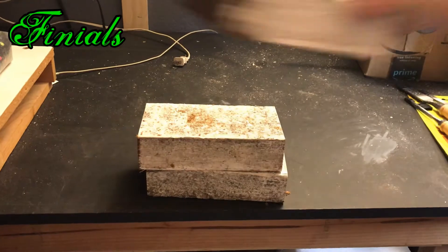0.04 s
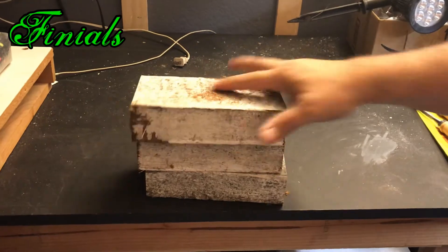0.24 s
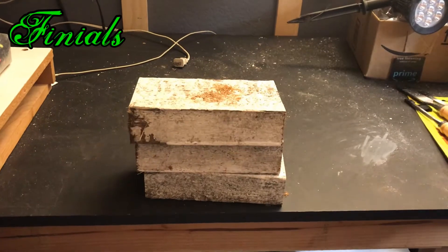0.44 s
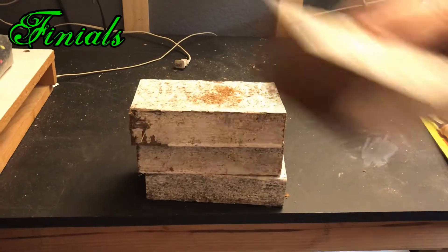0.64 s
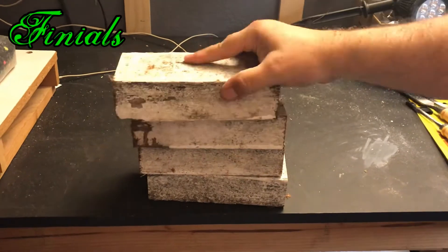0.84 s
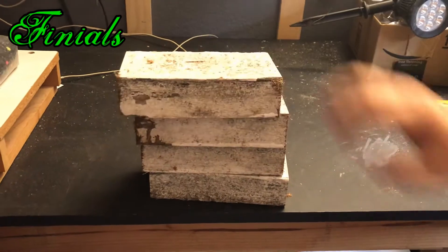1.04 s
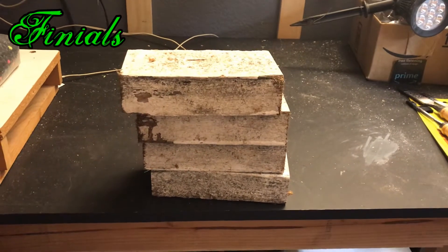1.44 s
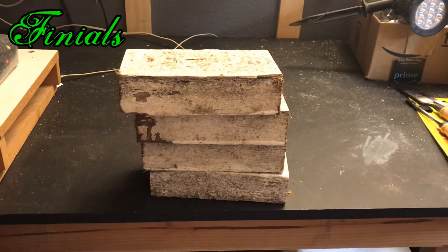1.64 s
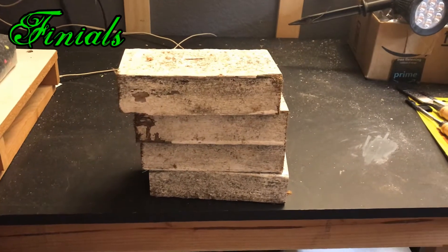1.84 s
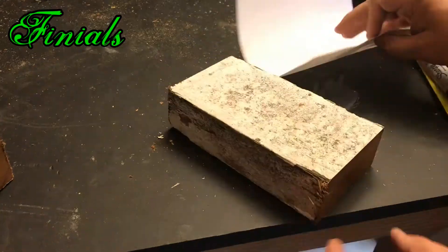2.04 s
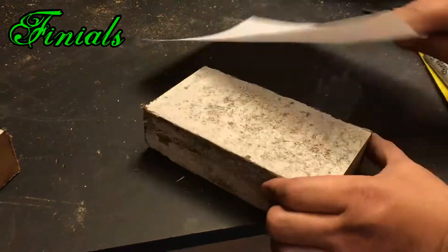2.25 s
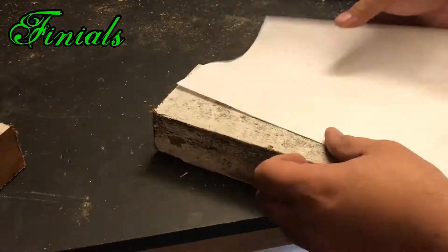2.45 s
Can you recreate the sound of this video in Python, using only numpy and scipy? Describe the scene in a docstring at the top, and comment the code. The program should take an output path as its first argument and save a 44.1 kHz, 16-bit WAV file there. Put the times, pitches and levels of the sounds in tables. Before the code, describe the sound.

Bricks land on a stack twice with sharp, stony clacks that ring the workbench, over a faint indoor fan. The sound shifts closer to a nudged brick and a crinkling sheet of paper, with light hiss.

```python
"""In a small shop with a humming fan, two bricks are set on a stack on a workbench. Each touches with
an edge, lands with a gritty snap and a clack, and rings the bench; the recorder's gain ducks after each.
Between them the second brick rubs as it is picked up. Soft low bumps come around the first landing and
after the second. At about 2 s the scene cuts to a closer spot with hiss and a faint whine, where a brick
is nudged over the bench, scuffing and knocking, and a crinkling sheet of paper is brought onto it."""
import sys
import numpy as np
from scipy import signal
from scipy.fft import rfft, irfft
from scipy.io import wavfile
from scipy.ndimage import uniform_filter1d, minimum_filter1d

SR = 44100
rng = np.random.default_rng(int(sys.argv[2]) if len(sys.argv) > 2 else 0)


def transcribe(signal):
    """Save signal, clipped to [-1, 1], as a 16-bit WAV file at the path in sys.argv[1]."""
    frames = np.atleast_2d(signal).T
    limited = np.clip(frames, -1, 1)
    pcm = np.round(limited * 32767).astype(np.int16)
    wavfile.write(sys.argv[1], SR, pcm)


N = 114660
TIME = np.arange(N) / SR
BAND_LIMIT_HZ = 15900


def amp(db):
    return 10 ** (np.asarray(db) / 20)


def unit(x):
    """Scales to rms 1."""
    return x / np.sqrt(np.mean(x ** 2) + 1e-20)


def read(points, hz):
    """Interpolates a table over log frequency."""
    f, value = np.transpose(points)
    return np.interp(np.log(hz + 1), np.log(f + 1), value)


def add(mix, start_s, sound):
    part = mix[max(round(start_s * SR), 0):][:len(sound)]
    part += sound[:len(part)]


def noise(spectrum, size, tilt_db_per_oct=0, focus_hz=None):
    """Coloured noise of rms 1; optional treble tilt and one resonance."""
    tilt_from_hz, focus_db, focus_width_oct = 710, 7.5, 0.26
    hz = np.fft.rfftfreq(size, 1 / SR)
    db = read(spectrum, hz) + tilt_db_per_oct * np.log2(np.maximum(hz / tilt_from_hz, 1))
    if focus_hz:
        offset_oct = np.log2(np.maximum(hz, 1) / focus_hz)
        db = db + focus_db * np.exp(-.5 * (offset_oct / focus_width_oct) ** 2)
    return unit(irfft(amp(db) * np.exp(2j * np.pi * rng.random(len(hz))), size))


def drift(below_hz):
    """Band-limited random wander, rms 1."""
    return unit(irfft(rfft(rng.standard_normal(N)) * (np.fft.rfftfreq(N, 1 / SR) < below_hz), N))


def strike(t, rise_s, t60_s):
    """Soft rise, exponential decay."""
    return (1 - np.exp(-(t / rise_s) ** 2)) * np.exp(-np.log(1000) * t / t60_s)


def tones(lines, waver_hz=1.22):
    """Steady sines, slightly wavering in pitch."""
    out = np.zeros(N)
    for hz, db in lines:
        cycles = np.cumsum(hz + waver_hz * drift(16.4)) / SR + rng.random()
        out += np.sqrt(2) * amp(db) * np.sin(2 * np.pi * cycles)
    return out


def fan():
    """Rush of air, hum, and a narrow treble band that flutters."""
    air_spectrum = [(15, -58), (25, -48), (69, -0.5), (140, -10.5), (173, -2.5), (233, -6.5), (260, -12.5),
                    (349, -8), (552, -13.5), (1450, -13.5), (1570, -11.5), (3170, -22.5), (7300, -28.5),
                    (9300, -30), (15500, -34)]  # rushing air: f/Hz, relative level/dB
    hum_lines = [(176, -49.5), (351.5, -57)]  # fan hum: f/Hz, level/dB
    band_hz, width_hz, band_db = 9300, 470, -54.5
    depth, period_s, peak_s = 0.51, .0955, 0.067
    hz = np.fft.rfftfreq(N, 1 / SR)
    passband = np.exp(-.5 * ((hz - band_hz) / width_hz) ** 2)
    band = unit(irfft(rfft(rng.standard_normal(N)) * passband, N))
    flutter = 1 - depth + depth * np.cos(2 * np.pi * (TIME - peak_s) / period_s)
    air = amp(-43 + 0.32 * drift(19)) * noise(air_spectrum, N)
    return air + tones(hum_lines) + amp(band_db + drift(30)) * band * flutter


def hiss_and_whine():
    """Steady air and faint tones at the closer spot."""
    hiss_spectrum = [(30, -15), (100, -17.5), (190, -5.5), (320, 2), (700, 1), (1050, -2.5), (1600, 0),
                     (2200, -5.5), (4000, -7), (7000, -6), (11000, -12), (15500, -13.5)]  # shop air: f/Hz, relative level/dB
    whine_lines = [(323, -58), (657, -47.5), (834.4, -56), (1250, -54), (1314, -53), (1755, -60.5)]  # whine: f/Hz, level/dB
    return amp(-44) * noise(hiss_spectrum, N) + tones(whine_lines)


def bumps():
    """Dull low pulses of a few cycles each."""
    events = [(.122, -28, 119), (0.162, -31, 134), (0.389, -31, 114), (1.361, -32, 101), (1.395, -31.5, 93),
              (1.737, -26, 92), (1.78, -26, 80), (1.8, -26.5, 124)]  # bumps: t/s, relative level/dB, f/Hz
    rumble = [(20, -27), (70, -7), (220, 5.5), (450, -42), (2000, -55.5)]  # f/Hz, relative level/dB
    out, t = np.zeros(N), TIME[:SR // 4]
    for s, db, hz in events:
        body = np.sin(2 * np.pi * hz * t) + 0.36 * noise(rumble, len(t))
        add(out, s, 2 * amp(db) * strike(t, rise_s=0.0059, t60_s=0.077) * body)
    return out


def friction(events, spectrum, grain_db=0.5):
    """Grainy noise bursts: each swells to a sudden stop, then dies away."""
    out, grain = np.zeros(N), unit(amp(grain_db * drift(580)))
    t = TIME[:SR // 3] - .1  # peak at t = 0
    for s, db, swell_s, t60_s, tilt_db_per_oct, focus_hz in events:
        envelope = np.exp(np.where(t < 0, t / swell_s, -np.log(1000) * t / t60_s))
        add(out, s + t[0], amp(db) * envelope * noise(spectrum, len(t), tilt_db_per_oct, focus_hz))
    return out * grain


def brick_pickup():
    """The second brick rubs as it is lifted."""
    # rubs: t/s, level/dB, swell/s, t60/s, tilt/(dB/oct), resonance/Hz
    rubs = [(.56, -47, 0.0076, .15, 1.5, 5950), (.617, -43.5, 0.017, .25, 1, 5030),
            (.68, -53, 0.057, .4, -1.5, 1200)]
    spectrum = [(40, -25), (300, 0.5), (1500, 8.5), (4000, -12), (10000, -7), (16000, -16)]  # rubbing brick: f/Hz, relative level/dB
    return friction(rubs, spectrum)


def paper():
    """The sheet crinkles in short bright snaps."""
    # snaps: t/s, level/dB, swell/s, t60/s, tilt/(dB/oct), resonance/Hz
    crinkles = [(1.99, -44, .006, 0.096, 6, 6500), (2.075, -41, .004, .12, 2, 10000),
                (2.097, -35.5, .004, 0.033, -3, 12600), (2.1428, -26.5, .0003, 0.0073, -4, 12000),
                (2.1575, -30, .003, 0.025, 7, 6500), (2.4305, -20.5, 0.00032, 0.021, 4, 11800),
                (2.4448, -31, 0.0008, 0.049, -4, 7000), (2.466, -25.5, 0.0049, 0.044, 0, 12500),
                (2.5057, -32.5, .0003, 0.022, 1, 7000), (2.527, -37.5, 0.0048, 0.052, -1, 11000),
                (2.545, -35, 0.0052, .06, -7, 7000), (2.554, -24.5, .0004, 0.027, 1, 6200)]
    spectrum = [(30, -55), (200, -26), (1500, -12), (4500, -3.5), (6400, 1.5), (8000, 0), (11800, 1),
                (14000, -1), (16000, -5.5)]  # paper: f/Hz, relative level/dB
    return friction(crinkles, spectrum)


def brick_nudges():
    """A pushed brick scuffs, then knocks on the bench."""
    # scuffs and knocks: t/s, level/dB, swell/s, t60/s, tilt/(dB/oct), resonance/Hz
    nudges = [(2.046, -32, 0.019, 0.047, 2.5, 3000), (2.0545, -26.5, 0.0019, 0.046, -1.5, 1400),
              (2.1642, -22.5, 0.00013, 0.041, -1, 460), (2.262, -25.5, 0.007, 0.077, 0, 910),
              (2.2633, -21, 0.00089, 0.016, 1.5, 800), (2.3403, -18, 0.00039, 0.02, 1, 4400),
              (2.343, -25.5, 0.0037, 0.05, 1, 1690)]
    spectrum = [(30, -50), (120, -27), (300, -22), (500, 0), (850, -2), (1050, -2.5), (1300, -2.5),
                (1550, -4.5), (1750, 6.5), (2000, -15.5), (2600, -15.5), (3200, -4.5), (4100, -23),
                (4800, -14), (8000, -20.5), (16000, -24)]  # brick on bench: f/Hz, relative level/dB
    return friction(nudges, spectrum)


def clack(t, bands=18, tail_db=-25):
    """Dense brick modes: treble speaks first, bass builds up; the shop adds a short tail."""
    spectrum = [(40, -8), (85, -2), (130, -10), (350, 2), (620, 3), (1000, 1.5), (1800, 1.5), (2700, -1),
                (3450, 2), (4200, -9.5), (5100, -6.5), (6300, -19), (9000, -22), (12000, -29), (16000, -31)]  # brick ring: f/Hz, relative level/dB
    ring_rise = [(100, 0.0061), (700, 0.0096), (1500, 0.003), (3000, 0.00043), (16000, 0.00086)]  # ring build-up: f/Hz, rise/s
    ring_t60 = [(60, 0.24), (400, .15), (1500, .13), (3500, .13), (8000, 0.19), (16000, 0.12)]  # ring decay: f/Hz, t60/s
    shop_t60 = [(100, .6), (300, 0.69), (1000, 0.33), (4000, 0.37), (16000, .25)]  # room decay: f/Hz, t60/s
    hz, centres_hz = np.fft.rfftfreq(len(t), 1 / SR), np.geomspace(60, BAND_LIMIT_HZ, bands)
    ring, out = rfft(noise(spectrum, len(t))), 0
    for centre_hz, weights in zip(centres_hz, np.eye(bands)):
        band = irfft(ring * read(list(zip(centres_hz, weights)), hz), len(t))
        rise_s = read(ring_rise, centre_hz)
        direct = strike(t, rise_s, read(ring_t60, centre_hz))
        tail = amp(tail_db) * strike(t, rise_s, read(shop_t60, centre_hz))
        out = out + band * np.hypot(direct, tail)
    return out


def brick_landings(grit_db=-9.5):
    """An edge touches, the face lands with a gritty snap and a clack, the bench takes the blow."""
    touches = [(0.212, -14.5), (0.2211, -17), (0.225, -23), (0.87, -12), (0.8769, -21), (0.88, -13.5)]  # edge contacts: t/s, level/dB
    touch_spectrum = [(300, -28), (1500, -19), (2500, -11), (3400, 1), (4500, -22.5), (7000, -28.5),
                      (9000, -37.5), (16000, -41)]  # edge tick: f/Hz, relative level/dB
    landings = [(.2277, -2, 4, 6.5), (.8832, 1.5, 5.5, 8)]  # face contacts: t/s, clack gain/dB, bench gain/dB, snap gain/dB
    bench_modes = [(83.1, -34, -14.5, 0.14), (151.7, -19, -26.5, 0.25), (192, -8.5, -8.5, .14),
                   (268, -8, -13.5, 0.14), (471.5, -2, -5, 0.12), (525, -8, -20.5, 0.13),
                   (754, -14.5, -20, .12), (808, -18.5, -6.5, 0.075), (1136, -9, -7, 0.099),
                   (1276, -17, -8.5, .13), (1540, -14.5, -40, 0.11), (1686, -1, -16, 0.077),
                   (2287, -22, -7.5, 0.085), (3134, -32, -5.5, 0.08), (3420, -23, -6.5, 0.069)]  # stack on bench: f/Hz, brick 1 level/dB, brick 2 level/dB, t60/s
    snap_modes = [(1140, -9, -0.5, 0.000454, 0.0046), (1790, -11, 6.5, 0.00043, 0.0057),
                  (2990, -2, 4.5, 0.00063, 0.013), (3400, -4, -0.5, .002, 0.032)]  # stone on stone: f/Hz, brick 1 level/dB, brick 2 level/dB, rise/s, t60/s
    grit_spectrum = [(500, -24.5), (3500, -7), (5100, -24), (6500, 1), (8400, 5), (11000, -4.5),
                     (16000, -12)]  # crushed grit: f/Hz, relative level/dB
    bench_rise_s = 0.00925
    out, t = np.zeros(N), TIME[:SR // 2]
    for s, db in touches:
        add(out, s, amp(db) * noise(touch_spectrum, len(t)) * strike(t, rise_s=0.00064, t60_s=0.0087))
    for brick, (s, clack_db, bench_db, snap_db) in enumerate(landings):
        bench = snap = 0
        for hz, *levels_db, t60_s in bench_modes:
            mode = np.sin(2 * np.pi * (hz * t + rng.random()))
            bench += amp(bench_db + levels_db[brick]) * strike(t, bench_rise_s, t60_s) * mode
        for hz, *levels_db, rise_s, t60_s in snap_modes:
            mode = np.sin(2 * np.pi * hz * t)
            snap += amp(snap_db + levels_db[brick]) * strike(t, rise_s, t60_s) * mode
        grit = amp(grit_db) * noise(grit_spectrum, len(t)) * strike(t, rise_s=0.00037, t60_s=0.028)
        add(out, s, amp(clack_db) * clack(t) + bench + snap + grit)
    return out


def scene():
    """Stacking, a cut, then close handling with thin bass."""
    cut_s, resume_s, low_cut_hz = 1.969, 1.9805, 260
    stacking = brick_landings() + brick_pickup() + bumps() + fan()
    low_cut = signal.butter(2, low_cut_hz, "high", fs=SR, output="sos")
    close = signal.sosfilt(low_cut, brick_nudges() + paper()) + hiss_and_whine()
    return (stacking * (TIME < cut_s) + close * (TIME > resume_s))[None]


def overshoot(db, release_db_per_s):
    """Follows peaks above 0 dB; releases at a steady rate."""
    fall_db = TIME * release_db_per_s
    return np.maximum(np.maximum.accumulate(db + fall_db) - fall_db, 0)


def record(dry):
    """Fast peak limiter; slow gain control that ducks, holds and recovers; band limit."""
    limit_db, duck_from_db, attack_s, hold_s = -1.8, 1, 0.0083, 0.25
    peak_db = 20 * np.log10(abs(dry[0]) + 1e-9)
    limiter_db = uniform_filter1d(overshoot(peak_db - limit_db, release_db_per_s=1494), size=20)
    half_hold = int(hold_s * SR / 2)
    held_db = -minimum_filter1d(-peak_db, 2 * half_hold + 1, origin=half_hold, mode="nearest")
    target_db = overshoot(held_db - duck_from_db, release_db_per_s=30.5)
    pole = np.exp(-1 / (attack_s * SR))
    duck_db = signal.lfilter([1 - pole], [1, -pole], target_db)
    limited = np.clip(dry / amp(np.maximum(limiter_db, duck_db)), -1, 1)
    lowpass = signal.firwin(255, BAND_LIMIT_HZ, window=("kaiser", 7), fs=SR)
    return signal.oaconvolve(limited, lowpass[None], "same")


dry = scene()
out = record(dry)
transcribe(out)
```